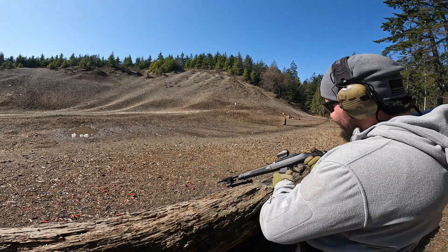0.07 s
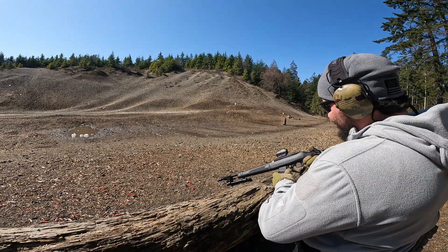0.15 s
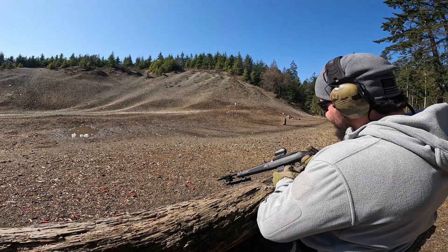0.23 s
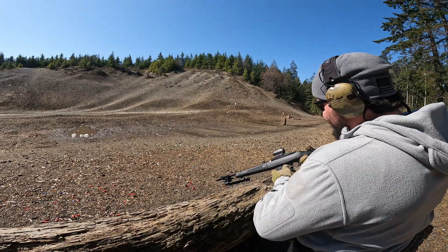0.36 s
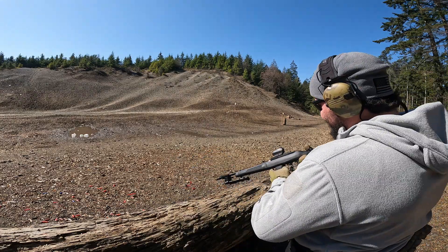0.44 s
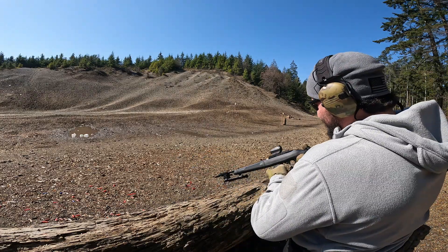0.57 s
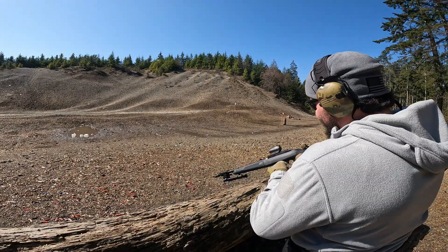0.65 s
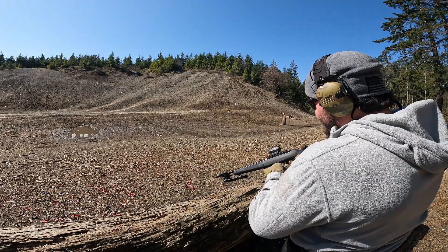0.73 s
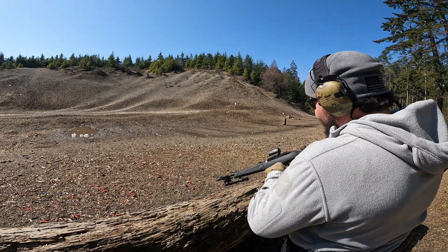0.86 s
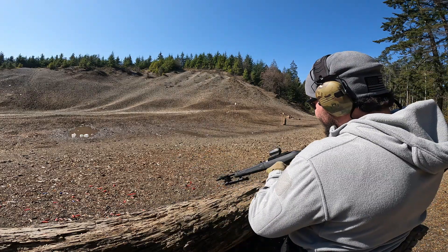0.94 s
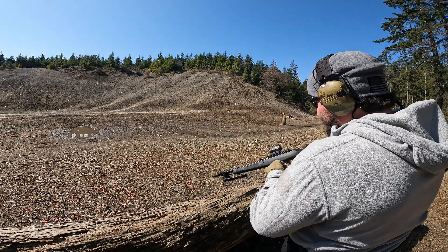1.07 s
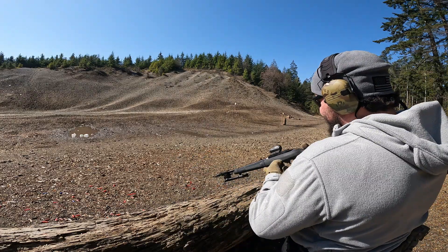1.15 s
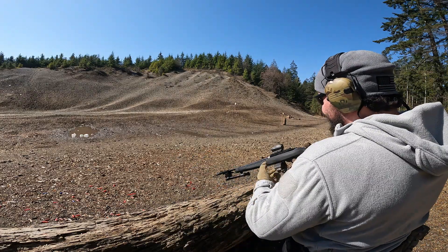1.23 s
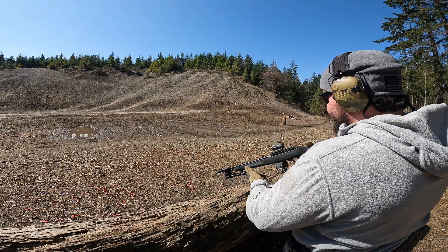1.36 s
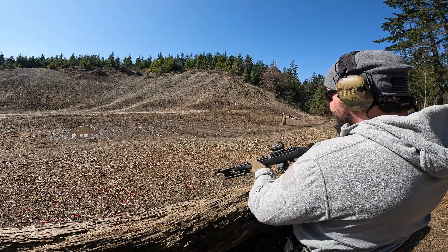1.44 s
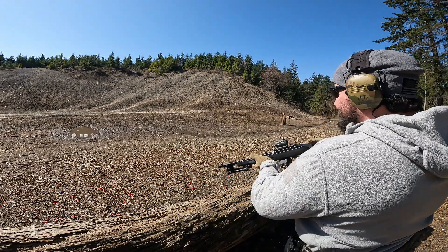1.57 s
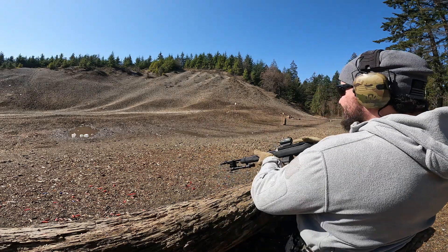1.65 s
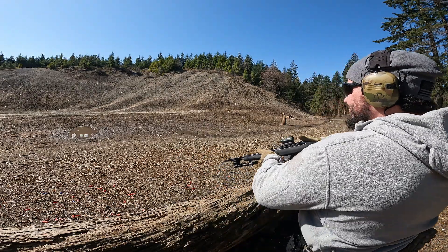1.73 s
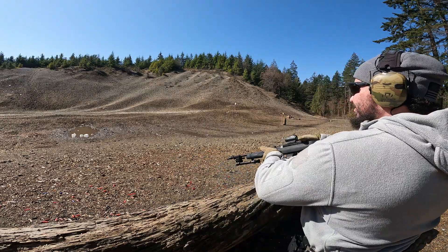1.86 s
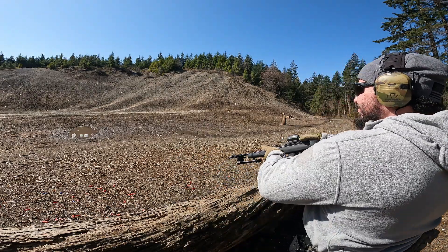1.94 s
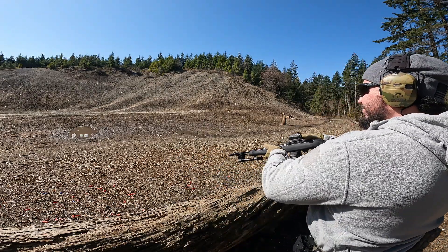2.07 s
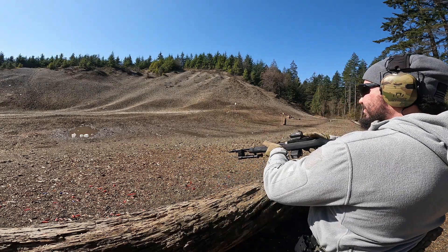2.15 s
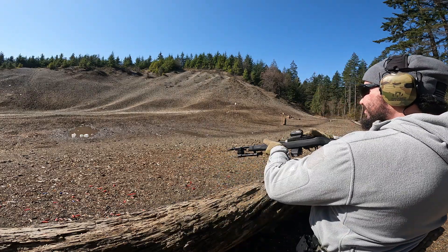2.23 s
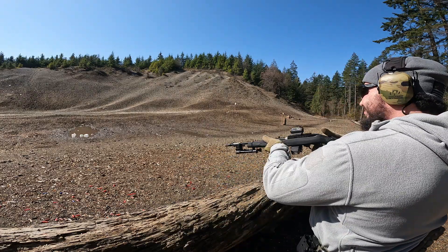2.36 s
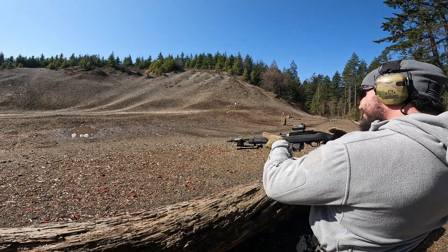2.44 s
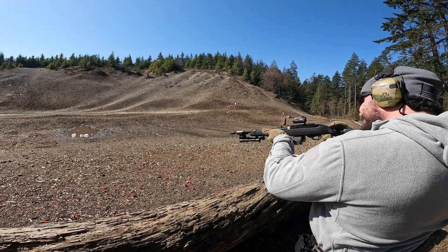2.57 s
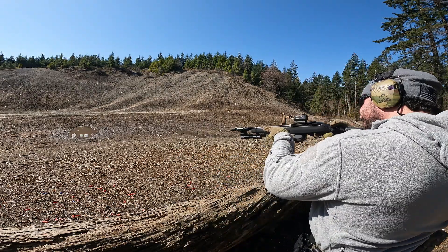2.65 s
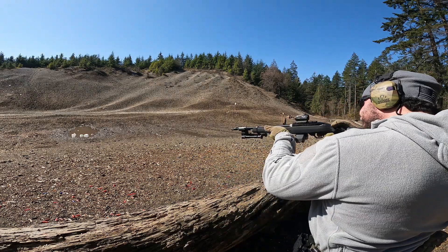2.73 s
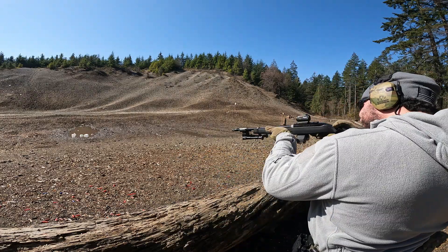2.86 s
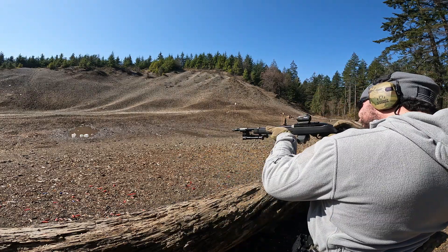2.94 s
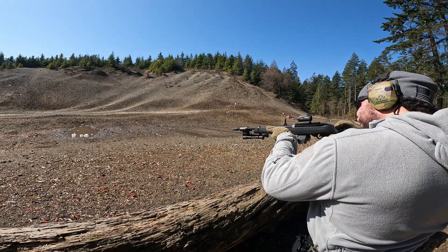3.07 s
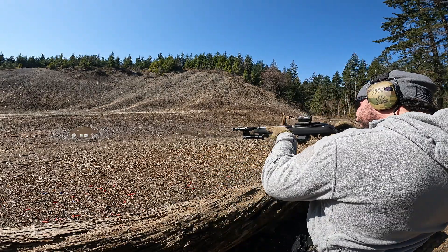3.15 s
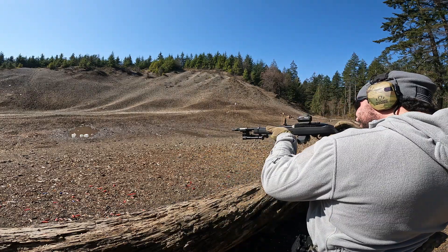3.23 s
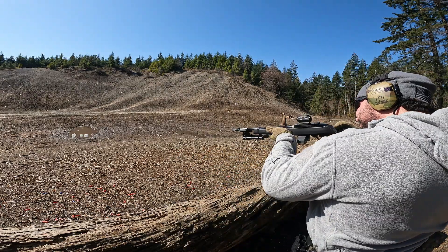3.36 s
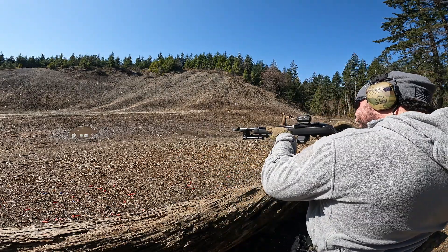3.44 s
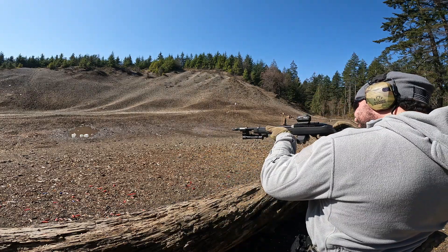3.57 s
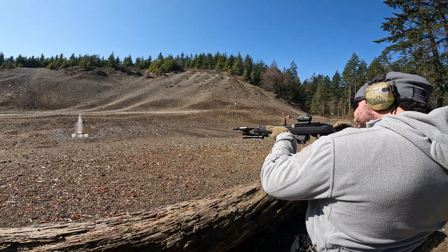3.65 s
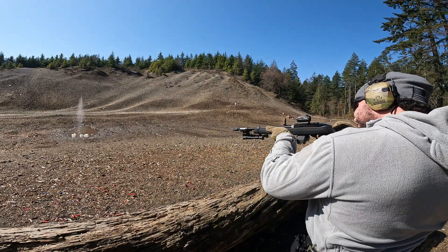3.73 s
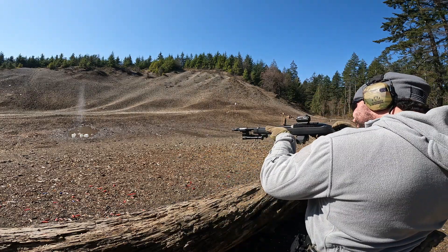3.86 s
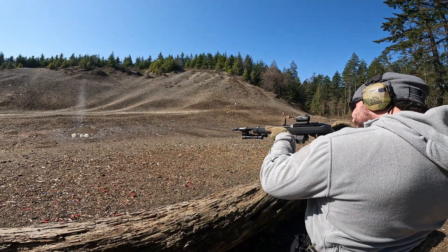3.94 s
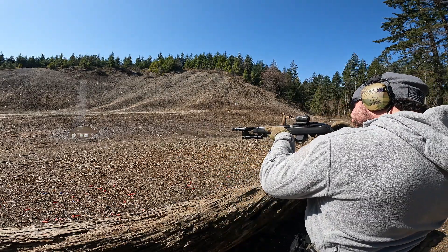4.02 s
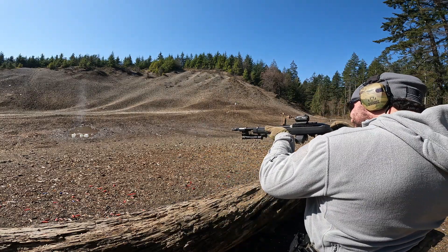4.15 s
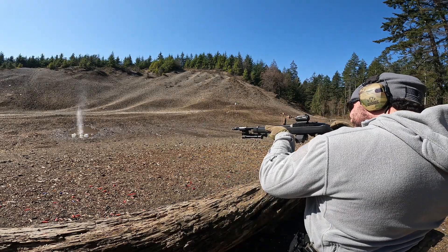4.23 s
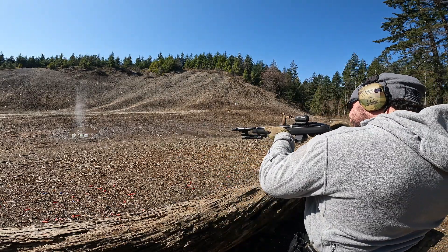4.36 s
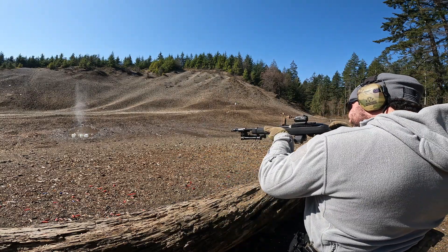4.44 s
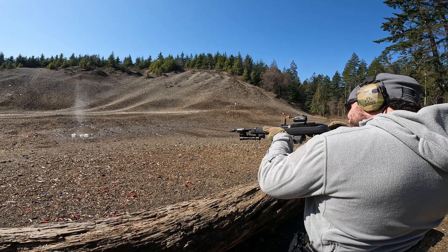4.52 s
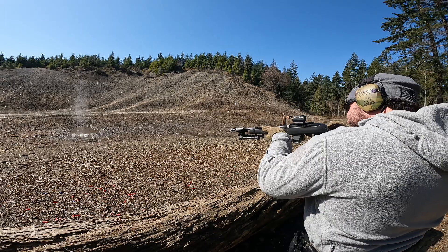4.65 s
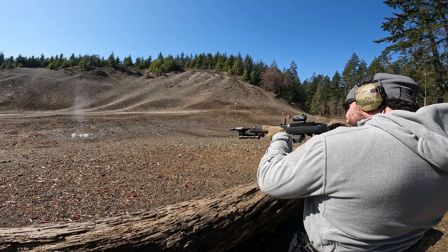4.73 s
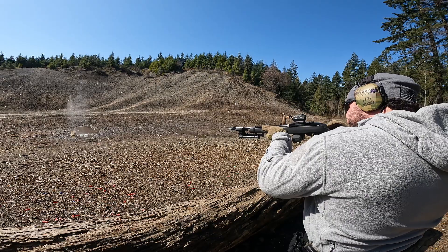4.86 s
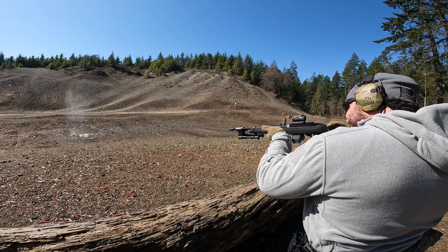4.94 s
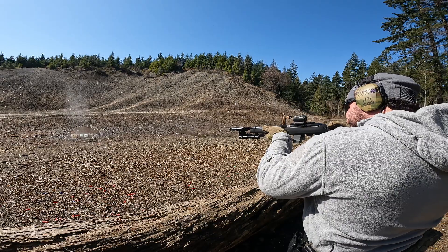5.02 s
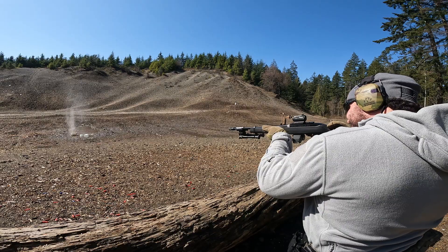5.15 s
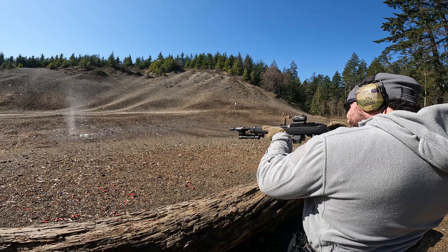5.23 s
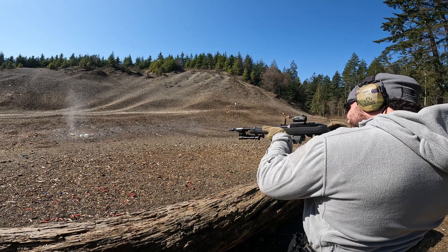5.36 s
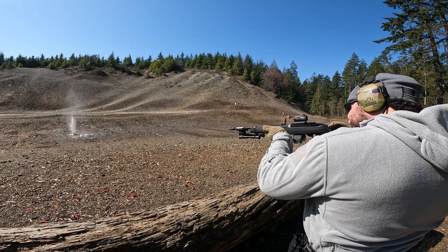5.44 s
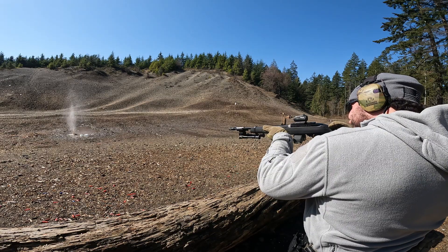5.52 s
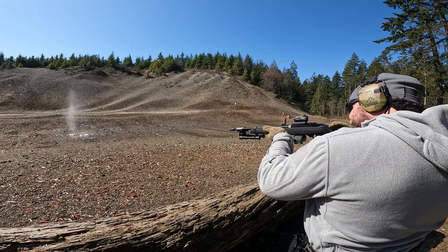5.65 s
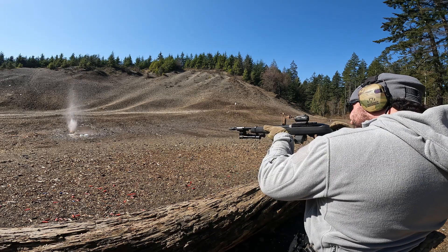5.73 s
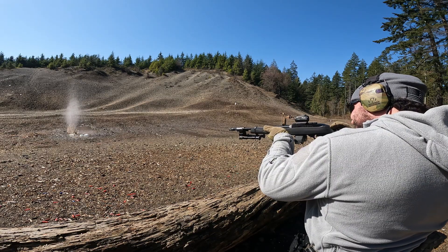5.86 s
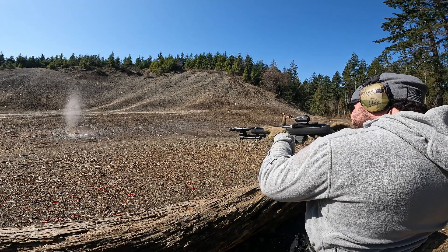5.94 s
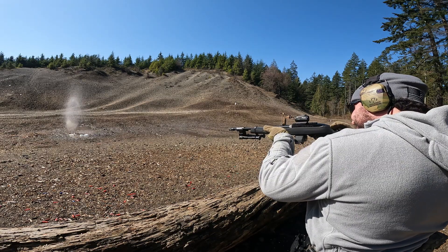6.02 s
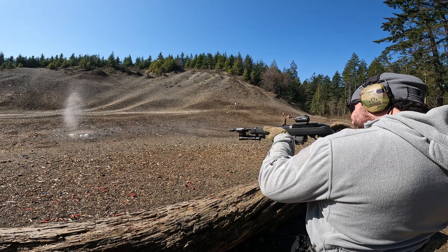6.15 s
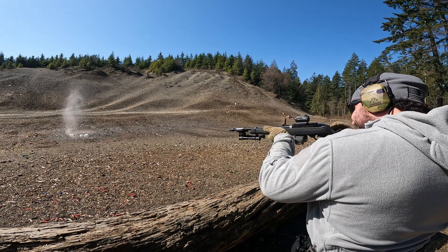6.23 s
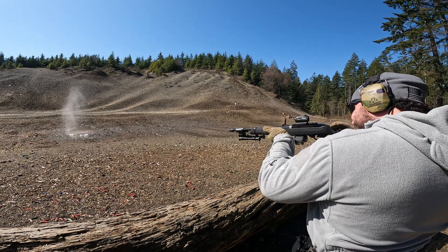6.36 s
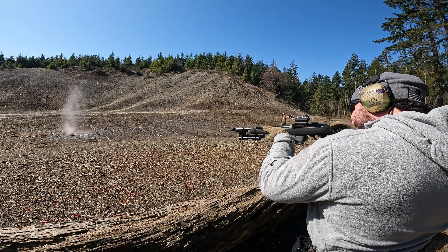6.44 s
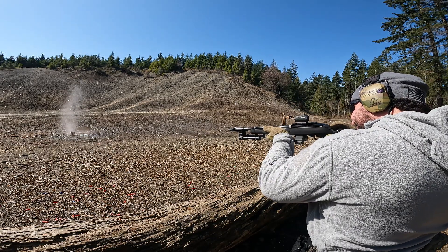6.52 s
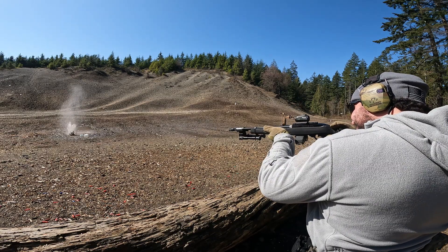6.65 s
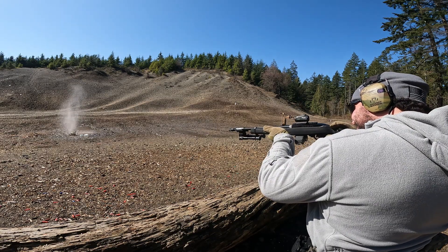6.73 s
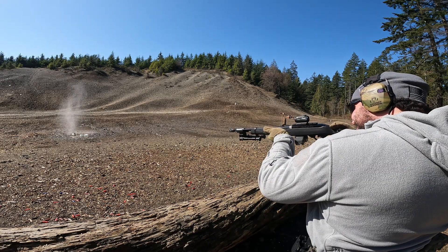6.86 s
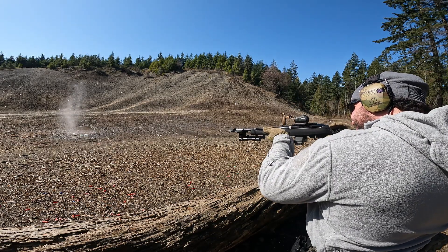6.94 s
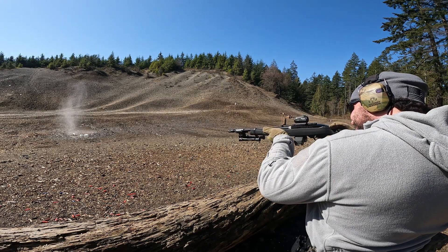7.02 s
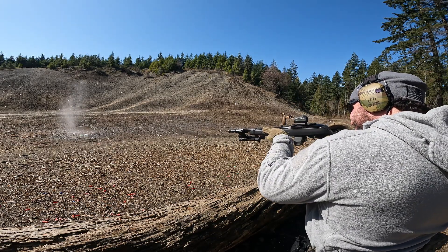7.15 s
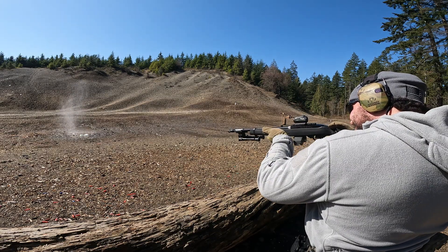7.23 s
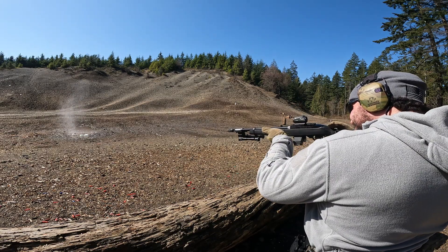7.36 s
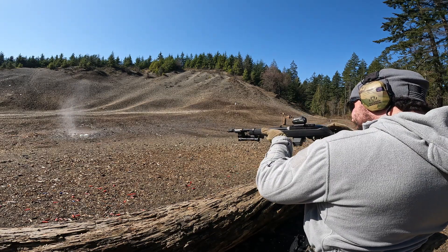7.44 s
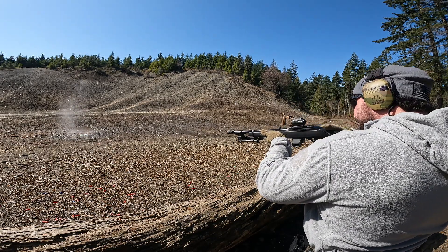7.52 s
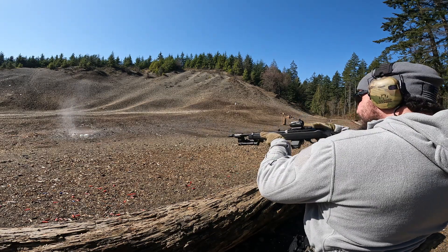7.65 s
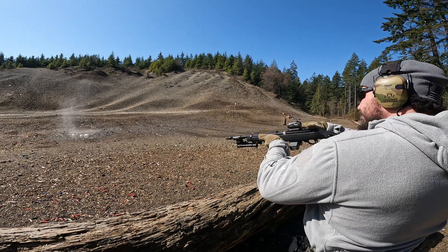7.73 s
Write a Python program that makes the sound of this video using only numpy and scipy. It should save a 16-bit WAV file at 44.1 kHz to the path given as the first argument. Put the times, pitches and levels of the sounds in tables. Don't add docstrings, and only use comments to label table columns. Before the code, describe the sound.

Outdoors at a gravel pit, wind buffets a small camera microphone beside a shooter. A magazine clacks, cloth and buckle scrape over wood, and the rifle bolt snaps with a bright steel ring. Then a string of ten dry, overloaded gunshots accelerates, each with a snap and thud at the target and a diffuse slope echo pumping underneath. The wash decays over faint brass ticks and distant traffic hum.

```python
import sys
import numpy as np
from scipy import signal
from scipy.io import wavfile
from scipy.ndimage import uniform_filter1d

SR = 44100
rng = np.random.default_rng(int(sys.argv[2]) if len(sys.argv) > 2 else 0)


def boost_factor(decibels):
    exponent = np.asarray(decibels, float) / 20
    return 10 ** exponent


def to_wav(sig):
    pcm = np.clip(np.atleast_2d(sig), -1, 1) * 32767
    pcm = np.round(pcm).astype(np.int16)
    wavfile.write(sys.argv[1], SR, pcm.T)


N = 343539
T = np.arange(N) / SR
STEP = 8
BANDS = 45 * 2 ** (np.arange(26) / 3)

# (t/s, blast level/dB, slope wash level/dB, bank echo level/dB, bank echo f/Hz)
SHOTS = [(3.721, -8, 3.5, -49, 206), (4.2857, -2, 4.5, -57, 230), (4.843, -1.5, 4.5, -47, 330),
         (5.148, -2, 2.5, -52.5, 307), (5.5042, -3, 4, -54.5, 260), (5.803, -2.5, 4.5, -51.5, 239),
         (6.054, -4.5, 3, -69, 270), (6.2871, -3, 2, -71, 330), (6.528, -2.5, 4.5, -53, 330),
         (6.7377, -3.5, -2.5, -46, 457)]
# (snap delay/ms, snap level/dB, thud delay/ms, thud f/Hz, thud level/dB)
HITS = [(76.7, -9, 85.1, 210, -8), (77, -9, 82, 146, -13), (76, -12.5, 79.8, 253, -6.5),
        (77.1, -6, 82, 210, -13.5), (77, -8.5, 84.0, 165, -11), (78.2, -10.5, 85.5, 223, -11),
        (78, -8.5, 81.5, 146, -19), (77.1, -8, 80.8, 59, -14.5), (78.1, -6.5, 81.0, 82, -11),
        (78.5, -11, 81.1, 390, -4)]
# (snap f/Hz, slap f/Hz, slap level/dB, slap delay/ms)
HIT_COLOUR = [(2700, 540, -19, 2), (2740, 600, -23.5, 1.9), (2870, 540, -14.5, 0.95),
              (2690, 500, -17.5, 2.04), (2500, 540, -20.5, 2.05), (2690, 570, -21.5, 1.97),
              (2700, 600, -20.5, 1.47), (2730, 600, -22, 1.5), (2680, 630, -12.5, 1.5),
              (2750, 610, -17, 1.58)]
# (delay/ms, spike level/dB, spike width/ms, rebound level/dB, rebound length/ms)
PATHS = [
    (0, -2.5, .14, -15, 1.6),
    (3.35, -3, .15, -11, 1.8),
    (6.45, -7, .2, -7, 2.1),
]
# (delay/ms, f/Hz, level/dB, length/cycles)
BOOM = (12.5, 139.5, -13.5, 0.5)
# (lead/ms, level/dB)
GHOSTS = [(10.67, -16), (21.33, -25), (32.0, -39)]
# (time from blast/ms, level/dB)
FORERUNNERS = [(-14, -19.5), (-11, -15), (-7.5, -14.5), (-4, -14)]
# (t/s, swing f/Hz, swing level/dB, length/cycles, crack level/dB)
SHOVES = [(3.7225, 160, -18, .8, -10), (4.2885, 170, -19, .5, -20), (4.846, 120, -45, .6, -50)]
# (peak time/ms, level/dB, rise/dB per ms, fall/dB per ms, treble tilt/dB per octave)
HISS = [
    (-19, -34, 2, .3, 3),
    (-7, -20.5, 1.05, 0.5, 2.7),
    (7, -20.5, 0.3, 2.5, 2.7),
    (13.5, -29, 2.5, 0.25, 2),
    (35, -30, .6, .6, 1.5),
    (64, -27.5, .5, 1, 1.5),
    (75, -23, .7, 1.2, 1),
    (104, -37, .6, .6, 0),
    (117.5, -33.5, 0.45, 1, -2),
    (140, -46, 0.2, 1, 1),
]
# (f/Hz, level/dB per Hz)
HISS_COLOUR = [(35, -34.5), (60, -1.5), (546, -5.5), (721, -7), (1870, 1.5), (2310, 2.5), (2980, 1.5),
               (4850, -9.5), (5840, -11), (7370, -15), (8470, -21.5), (12300, -29.5), (15500, -42)]
# (f/Hz, level/dB per Hz)
WASH_COLOUR = [(30, -12), (140, -5), (230, -5.5), (370, -1), (790, -3), (1900, -0.5), (3200, -4),
               (7300, -17.5), (8600, -20), (10300, -39), (12200, -37), (13500, -41), (15500, -54)]
# (f/Hz, t60/s)
WASH_T60 = [(100, 1.43), (400, 3.2), (1000, 2.89), (2500, 2.18), (6000, 1.63), (9500, 1.08), (12300, 1.6)]
# (f/Hz, time/s)
WASH_RISE = [(100, 0.064), (400, 0.39), (2500, 0.14), (8000, 0.12)]
# (delay/s, spread/s, width/octaves)
BANK = (.23, .1, 1.1)
# (time from shot/ms, level/dB)
DUCK = [(-25.5, 4), (1, -4), (98, -8), (144, -8), (194, 17)]
# (t/s, strength level/dB, hardness/dB gained per higher band)
MAGAZINE = [(0.01, -33, 0.5), (0.05, -50.5, 2), (0.106, -23, 0.5), (0.13, -41, -2.5), (0.151, -53, 5),
            (0.259, -62, -6), (0.271, -56, -5), (0.318, -24.5, -8.5), (0.332, -35, -21), (0.381, -41, -24),
            (0.422, -31.5, -6.5), (0.449, -32, -12), (0.455, -30.5, -5.5), (0.483, -43.5, 0),
            (0.891, -36, 1), (0.9, -31, -2), (0.911, -36, -2), (0.929, -36, 1), (0.9355, -40, 6)]
SLING = [(1.109, -63, -1.5), (1.361, -61, -1), (1.511, -62, -1), (1.57, -42, -13), (1.589, -46, -5),
         (1.731, -37, -13), (1.758, -47, -7), (1.776, -43, -15), (1.791, -35, -14), (1.825, -38, -13),
         (1.874, -34, -13), (1.89, -32, -13), (1.898, -32, -13), (1.907, -25, -9.5), (1.924, -24, -18),
         (1.934, -26, -13), (1.953, -41.5, 4.5), (1.983, -36, -10)]
BOLT = [(2.034, -41.5, 2.5), (2.185, -46.5, -1), (2.23, -33, 9), (2.264, -20, 1.5), (2.38, -39, 3.5),
        (2.426, -26, 3), (2.443, -36, 3.5), (2.586, -54, -12)]
STOCK = [(3.431, -31, -34.5), (3.45, -39, -35), (3.487, -58, -14.5), (3.584, -39, -40), (3.591, -40.5, -41)]
CASES = [(6.957, -40, 7.5), (6.963, -40, 1.5), (7.388, -40.5, -25), (7.585, -45, -16), (7.6, -46, -16),
         (7.744, -62, 3.5), (7.78, -68, 4)]
# (clicks, rise/ms, t60/s, extra top band level/dB, low knock level/dB)
PARTS = [
    (MAGAZINE, 0.46, 0.023, -0.9, -19.5),
    (SLING, 0.55, .02, 3.8, -19.5),
    (BOLT, .3, 0.017, -15, -17),
    (STOCK, 3, 0.057, 12, -38),
    (CASES, .5, 0.054, -14, -30.5),
]
# (start t/s, peak t/s, end t/s, strength level/dB,
# hardness/dB per higher band)
SLIDES = [(0, 0.016, 0.05, -49, 4), (0.098, 0.135, 0.17, -44, 2.5), (0.308, 0.333, 0.37, -48, 3),
          (0.412, 0.441, 0.45, -53, -2), (0.438, 0.457, 0.5, -49.5, 5), (0.883, 0.895, 0.97, -38.5, -1),
          (1.31, 1.356, 1.38, -70, 4.5), (1.563, 1.6, 1.6, -54, 1), (1.748, 1.773, 1.82, -50, -17),
          (1.795, 1.921, 2.02, -37.5, -13), (2.197, 2.235, 2.29, -41, -0.5),
          (2.245, 2.264, 2.29, -33.5, 1.5), (2.38, 2.38, 2.49, -52, -5), (2.397, 2.415, 2.436, -28, 3),
          (2.426, 2.45, 2.463, -40, 2), (2.468, 2.53, 2.8, -69.5, 4), (6.921, 6.917, 7.23, -49, -1)]
# (f/Hz, width/Hz, level/dB)
BODY = [(1084, 710, -1.5), (1800, 1100, -2), (3560, 2170, 3.5), (3920, 1800, -8), (5320, 870, 4.5),
        (6940, 1600, 2.5), (9900, 3500, -6), (12800, 2500, -7)]
# (f/Hz, width/Hz, level/dB)
HOLLOW = [(1020, 110, 1), (1370, 290, -9.5)]
# (f/Hz, level/dB, t60/s)
BARREL = [(10540, 0, .7), (13460, -11, .55), (4845, -15, .6), (5180, -11, .6), (5260, -10, .9),
          (5390, -12, .6)]
# (t/s, level/dB)
BARREL_BLOWS = [(.93, -87), (2.264, -61), (2.427, -50)]
# (f/Hz, level/dB, t60/s)
LOCK = [(400, -20, .012), (950, -8, .022), (2080, -6, .01), (4560, -6, .007), (5030, -5, .015),
        (5300, -7, .018), (5600, -4, .006), (6600, -16, .012), (11600, -15, .006), (12500, -18, .006)]
SEAT = [(450, -20, .015), (1114, -8, .03), (1916, -7, .02), (2200, -9, 0.018), (2659, -9, .02),
        (3149, -6.5, .025), (4027, -11, .02), (5300, -13.5, .015), (6971, -7, .008)]
BRASS = [(1175, -7, .04), (2730, -10, .04), (3290, -7, .04), (4620, -4, .04), (5350, -3.5, .035),
         (7510, -17, .02)]
# (tones, list of blows (t/s, level/dB))
CLANGS = [
    (LOCK, [(2.4262, -5), (2.4438, -21)]),
    (SEAT, [(2.264, -9)]),
    (BRASS, [(6.957, -22), (6.9628, -24), (6.968, -31)]),
]
# (t/s, peak level/dB, f/Hz)
TICKS = [(1.7302, -23, 1000), (1.759, -38, 1210), (1.7765, -31, 700), (1.779, -33, 2000),
         (1.7905, -29, 900), (1.797, -31, 1000), (1.826, -32.5, 1100), (1.858, -32, 1170),
         (1.8748, -23, 1050), (1.890, -23, 1500), (1.897, -22, 1400), (1.903, -24, 1100),
         (1.908, -20, 1600), (1.9225, -13.5, 1120), (1.9335, -14, 1090), (1.937, -22, 1600),
         (1.957, -26, 1200), (.8965, -17, 1900), (.9, -17, 1300), (.9025, -20, 1900), (.9085, -22, 1600),
         (.912, -24, 1900), (.9292, -16, 3500), (.9357, -21, 6000)]
# (t/s, level/dB)
SCRAPE = [(0, -49), (.12, -55.5), (.2, -59.5), (1.7, -81), (1.8, -67), (1.92, -36.5), (2.0, -51),
          (2.05, -72)]
# (t/s, level/dB)
RUSTLE = [(0, -60.5), (.25, -67.5), (.52, -58), (.85, -72), (.98, -65), (1.15, -71), (1.5, -67.5),
          (1.7, -62), (2.17, -62.5), (2.3, -59), (2.47, -63), (2.75, -70), (3.0, -77.5), (3.65, -72)]
RUSTLE_BANDS_DB = (-0.5, -8, -13)
# (t/s, level/dB)
WIND = [(0.0, -50), (0.14, -59.5), (0.3, -44.5), (0.44, -50), (0.6, -39.5), (0.83, -50.5), (0.92, -43.5),
        (1.22, -60.5), (1.51, -62.5), (1.85, -57), (2.08, -63), (2.42, -55.5), (2.64, -66.5), (2.97, -60.5),
        (3.6, -67), (6.9, -68.5), (7.5, -70.5), (7.79, -62)]
# (t/s, depth level/dB, width/ms)
SLAPS = [(.3, -48, 1), (0.581, -14, 2), (.589, -29, -8), (.612, -28, 10), (.64, -29, -13),
         (0.664, -22.5, 6), (.69, -28.5, -17), (0.709, -21.5, 4), (.73, -30.5, -16), (1.04, -44, 27)]
# (f/Hz, level/dB per Hz)
AIR = [(100, -21), (135, -13.5), (180, -2.5), (260, -14.5), (400, -16), (600, -21), (800, -22.5),
       (1000, -14.5), (1450, -23), (1800, -39.5), (2500, -47), (6000, -60.5), (8000, -72)]
# (t/s, side level/dB)
WIDTH = [(0, -10.5), (4.28, -11.5), (4.33, -27), (4.45, -28), (4.8, -42), (4.9, -42), (7.79, -36.5)]
# (f/Hz, width/Hz, share added)
PORT = [(8290, 900, -0.45), (12140, 1000, .6)]

CRACK_DB, HEAVE_DB, LEAD_DB = (4, -12), (-20, -28), (-7, 0.0)
THUD_CYCLES, FORE_DB = (0.58, 0.35), (-8, 2)


def read(table, hz):
    points = np.array(table)
    return np.interp(np.log(hz), np.log(points[:, 0]), points[:, 1])


def band(x, lo_hz, hi_hz):
    sos = signal.butter(2, [lo_hz, min(hi_hz, 0.49 * SR)], "band", fs=SR, output="sos")
    return signal.sosfilt(sos, x)


def unit(x):
    return x / np.sqrt(np.mean(x ** 2))


def walk(rate, size=1):
    hold, count = int(SR / size / rate), N // size + 1
    levels = np.repeat(rng.standard_normal(count // hold + 1), hold)
    smooth = uniform_filter1d(uniform_filter1d(levels, hold), hold)
    return unit(smooth[:count])[:N]


def fine(x):
    return uniform_filter1d(np.repeat(x, STEP), STEP)[:N]


def colour(table):
    gain = boost_factor(read(table, BANDS)) * np.sqrt(BANDS)
    return gain / np.sqrt(np.sum(gain ** 2))


def add(out, s, shape, lead=0.0, size=1):
    i = int((s - lead) * SR / size)
    a, b = max(i, 0), min(i + len(shape), len(out))
    out[a:b] += shape[a - i:b - i]


def third(hz, count):
    sos = signal.butter(3, [hz * 2 ** (-1 / 6), hz * 2 ** (1 / 6)], "band", fs=SR, output="sos")
    return unit(signal.sosfilt(sos, rng.standard_normal((2, count))))


def resonate(modes, lo, hi, count=N):
    return unit(sum(boost_factor(db) * band(rng.standard_normal((2, count)), hz - width / 2, hz + width / 2)
                    for hz, width, db in modes if lo < hz < hi))


def swing(ms, hz, db, cycles):
    turn = ms * hz / 1000
    return -boost_factor(db) * np.cos(2 * np.pi * turn) * np.exp(-0.5 * (turn / cycles) ** 2)


def forerunners(ms, fore_db):
    out = np.zeros(len(ms))
    for ahead, db in FORERUNNERS:
        u = ms - ahead
        level = boost_factor(db + fore_db + 1.5 * rng.standard_normal())
        hz = 2500 * (1 + 0.12 * rng.standard_normal())
        tone = np.cos(2 * np.pi * (hz * u / 1000 + rng.random()))
        out += level * np.exp(-0.5 * (u / 0.45) ** 2) * tone
    return out


def blast(ms, crack_db, fore_db):
    out = swing(ms - BOOM[0], *BOOM[1:])
    for delay, spike_db, width, rebound_db, length in PATHS:
        u = ms - delay + 0.04 * rng.standard_normal()
        dip = np.exp(-0.5 * (u / (width * np.where(u > 0, 1.4, 0.6))) ** 2)
        push = np.exp(-0.5 * ((u + 1.2 * width) / (0.45 * width)) ** 2)
        dip -= 0.8 * push * np.exp(-delay / 3.5)
        after = u - width
        rebound = np.sin(np.pi * np.clip(after / length, 0, 2)) * np.where(after > length, 0.35, 1)
        size = boost_factor(rng.standard_normal())
        out += size * (boost_factor(rebound_db) * rebound - boost_factor(spike_db) * dip)
    crack = unit(band(rng.standard_normal(len(ms)), 1200, 8000))
    out += forerunners(ms, fore_db)
    return out + boost_factor(crack_db) * crack * np.exp(-0.5 * (ms / 0.5) ** 2)


def target_hit(ms, k):
    snap_ms, snap_db, thud_ms, thud_hz, thud_db = HITS[k]
    snap_hz, slap_hz, slap_db, slap_ms = HIT_COLOUR[k]
    later, u = min(k, 1), ms - snap_ms
    ring = np.cos(2 * np.pi * (snap_hz * u / 1000 + rng.random()))
    grit = unit(band(rng.standard_normal(len(ms)), 1600, 4400))
    snap = boost_factor(snap_db) * (0.75 * ring + 0.5 * grit) * np.exp(-(u / np.where(u < 0, 1.3, 0.8)) ** 2)
    slap = swing(u - slap_ms, slap_hz, slap_db, 0.45)
    sagging = (ms - thud_ms) * np.where(ms > thud_ms, 0.82, 1)
    cycles = min(THUD_CYCLES[later], thud_hz * 2.2 / 1000 + 0.7 * (1 - later))
    return snap + slap + swing(sagging, thud_hz, thud_db, cycles)


def shots_and_hits():
    out, ms = np.zeros(N), np.arange(-60, 150, 1000 / SR)
    for k, (s, db, *_) in enumerate(SHOTS):
        later, thud_ms = min(k, 1), HITS[k][2]
        heave = swing(ms - 12, 32, HEAVE_DB[later], 0.56)
        heave += swing(ms - thud_ms, 40, HEAVE_DB[later] - 1.5, 0.34)
        shot = boost_factor(db) * blast(ms, CRACK_DB[later], FORE_DB[later])
        add(out, s, shot + target_hit(ms, k) + heave, lead=0.06)
    bright = band(out, 510, 16000)
    return out + sum(boost_factor(db) * np.roll(bright, -int(ahead * SR / 1000)) for ahead, db in GHOSTS)


def shoves():
    out, ms = np.zeros(N), np.arange(-30, 30, 1000 / SR)
    for (s, hz, db, cycles, crack_db), (shot_s, *_) in zip(SHOVES, SHOTS):
        add(out, s, swing(ms, hz, db, cycles), lead=0.03)
        add(out, shot_s, swing(ms, 800, crack_db, 0.3), lead=0.03)
    return out


def scatter_stage(u, ms, db, rise, fall):
    level = db + np.where(u < ms, rise * (u - ms), fall * (ms - u))
    too_early = np.maximum(-22.5 - u, 0)
    too_late = (ms < 50) * np.maximum(u - 70, 0)
    return boost_factor(2 * (level - 2 * (too_early + too_late)))


def scatter():
    u = np.arange(-70, 260, 1000 * STEP / SR)
    age = np.arange(N // STEP + 1) * STEP / SR
    stages = [scatter_stage(u, *row[:4]) for row in HISS]
    duck = 1
    for s, *_ in SHOTS:
        duck_db = np.interp(1000 * (age - s), *np.transpose(DUCK), left=0, right=0)
        duck = np.minimum(duck, boost_factor(duck_db))
    out, start = np.zeros((2, N)), int(3.6 * SR)
    clump = boost_factor(3.2 * walk(400, size=STEP))
    bank_s, spread_s, bank_octaves = BANK
    bank = np.exp(-((age[:SR // 2 // STEP] - bank_s) / spread_s) ** 2)
    leads = [boost_factor(2 * db * (u < -2)) for db in LEAD_DB]
    swell_db = 3.5
    swell = swell_db * walk(9, size=STEP)
    for hz, near, far in zip(BANDS, colour(HISS_COLOUR), colour(WASH_COLOUR)):
        octaves = np.log2(hz / 2500)
        hiss = sum(stage * boost_factor(2 * row[-1] * max(octaves, 0)) for stage, row in zip(stages, HISS))
        bass_db = 1.4 * min(max(-octaves - 1, 0), 2)
        hiss = hiss * (near * boost_factor(bass_db)) ** 2
        power, wash = np.zeros((2, len(age)))
        build_up = (1 - np.exp(-age / read(WASH_RISE, hz))) ** 2
        tail = build_up * boost_factor(-120 * age / read(WASH_T60, hz))
        for k, (s, _, wash_db, bank_db, bank_hz) in enumerate(SHOTS):
            add(power, s, hiss * leads[min(k, 1)], lead=0.07, size=STEP)
            add(wash, s + 0.1, tail * (far * boost_factor(-36 + wash_db)) ** 2, size=STEP)
            off_pitch = np.log2(hz / bank_hz) / bank_octaves
            add(wash, s, bank * boost_factor(bank_db - 13.6 * off_pitch ** 2) ** 2, size=STEP)
        swell = 0.8 * np.roll(swell, -int(0.02 * SR / STEP)) + 0.6 * swell_db * walk(9, size=STEP)
        flicker = boost_factor(2.5 * walk(30, size=STEP) + swell)
        loudness = fine(np.sqrt(power * clump + wash * duck ** 2 * flicker))
        out[:, start:] += loudness[start:] * third(hz, count=N - start)
    return out, fine(duck)


def slides(k):
    out = np.zeros(N)
    for start, peak, end, db, hard_db in SLIDES:
        span = T[:max(int((end - start) * SR), 1)] + start
        level = boost_factor(db + k * hard_db + (k == 2) * -10)
        add(out, start, level * np.interp(span, [start, peak, end], [0, 1, 0]) ** 1.28)
    return out


def clicks(k):
    out, age = np.zeros(N), T[:4000]
    for hits, rise_ms, t60, top_db, _ in PARTS:
        shape = boost_factor(-60 * age / max(t60, 0.004)) * (1 - np.exp(-1000 * age / rise_ms))
        for s, db, hard_db in hits:
            add(out, s, shape * boost_factor(db + k * hard_db + (k == 2) * top_db), lead=0.00018)
    return out


def handling():
    out = np.zeros((2, N))
    grit = boost_factor(2.6 * walk(700))
    for k, (lo, hi) in enumerate([(600, 2530), (2400, 6200), (6000, 12000)]):
        rustle_db = np.interp(T, *np.transpose(RUSTLE), right=-120) + RUSTLE_BANDS_DB[k]
        size = boost_factor(rustle_db + 1.8 * walk(48)) + grit * slides(k) + clicks(k)
        tone = resonate(BODY, lo, hi)
        if k == 0:
            a, b = int(3.4 * SR), int(3.7 * SR)
            tone[:, a:b] = resonate(HOLLOW, lo, hi, count=b - a)
        edges = 0.55 * lo, 1.15 * hi
        out += band(band(size * tone, *edges), *edges)
    out[0] += knocks() + barrel() + clangs()
    return out + cloth()


def knocks():
    out, ms = np.zeros(N), 1000 * T[:600] - 6
    for hits, *_, knock_db in PARTS:
        for s, db, _ in hits:
            add(out, s, swing(ms, 330, db + knock_db, 0.63), lead=0.004)
    return out


def barrel():
    out, age = np.zeros(N), T[:SR]
    ring = sum(boost_factor(db - 60 * age / t60) * np.sin(2 * np.pi * hz * age) for hz, db, t60 in BARREL)
    for s, blow_db in BARREL_BLOWS:
        add(out, s, boost_factor(blow_db) * ring * np.clip(age / 0.06, 0, 1) ** 2)
    return out


def clangs():
    out, age = np.zeros(N), T[:3000]
    for modes, blows in CLANGS:
        for s, blow_db in blows:
            ring = sum(boost_factor(db - 60 * age / t60) * np.sin(2 * np.pi * (hz * age + rng.random()))
                       for hz, db, t60 in modes)
            add(out, s, boost_factor(blow_db) * ring * np.clip(age / 0.00059, 0, 1))
    for s, db, hz in TICKS:
        add(out, s, -boost_factor(db) * np.sin(2 * np.pi * hz * age) * np.exp(-hz * age / 1.65))
    return out


def cloth():
    level = boost_factor(np.interp(T, *np.transpose(SCRAPE), right=-120) + 2.5 * walk(90))
    return level * unit(band(rng.standard_normal((2, N)), 170, 540))


def wind():
    level = boost_factor(np.interp(T, *np.transpose(WIND)) + 3.5 * walk(15))
    mid, side = (level * unit(band(band(rng.standard_normal(N), 12, 71), 7.4, 90)) for _ in range(2))
    side = side * np.interp(T, [4.25, 4.4], [0.7, 0.05])
    slaps, early = np.zeros(N), T[:60000]
    for s, db, width in SLAPS:
        add(slaps, 0, -np.sign(width) * boost_factor(db) * np.exp(-0.5 * ((early - s) * 1000 / width) ** 2))
    return np.array([mid + side + 1.3 * slaps, mid - side + 0.7 * slaps])


def air():
    held = boost_factor(np.interp(T, [3.7, 3.75, 7.3, 7.79], [0.5, -12.5, -9.0, 1.5]))
    whine_hz = 12300
    whine = unit(band(rng.standard_normal((2, N)), whine_hz - 350, whine_hz + 350))
    whine = fine(boost_factor(-100 + 2.2 * walk(9, size=STEP))) * whine
    far = np.zeros((2, N))
    for hz, gain in zip(BANDS[4:23], colour(AIR)[4:23]):
        far += gain * fine(boost_factor(-57.5 + 2.5 * walk(4.1, size=STEP))) * third(hz, count=N)
    return whine + held * far


def scene():
    shots, hands, far = shots_and_hits(), handling(), air()
    spread, duck = scatter()
    mid = shots + spread[0] + hands[0] + far[0] * duck
    lag = 1.2 * band(np.diff(shots + hands[0], prepend=0), 200, 7000)
    lag += 0.3 * band(np.roll(shots, 60), 30, 800)
    side = lag + 0.7 * spread[1] + hands[1] + 0.98 * far[1] * duck
    top = band(band(0.78 * spread[1] - 0.5 * mid, 11300, 13600), 11300, 13600)
    side = side * boost_factor(np.interp(T, *np.transpose(WIDTH))) + top - shoves()
    return np.array([mid - side, mid + side]) + wind()


def band_limit(x):
    return signal.sosfilt(signal.butter(12, 15650, fs=SR, output="sos"), x)


def record(dry):
    port = dry + sum(share * band(dry, hz - width / 2, hz + width / 2) for hz, width, share in PORT)
    top_cut = signal.sosfilt(signal.butter(6, 15500, fs=SR, output="sos"), port)
    mix = np.clip(top_cut, -1, 1)
    return band_limit(mix)


dry = scene()
out = record(dry)
to_wav(out)
```